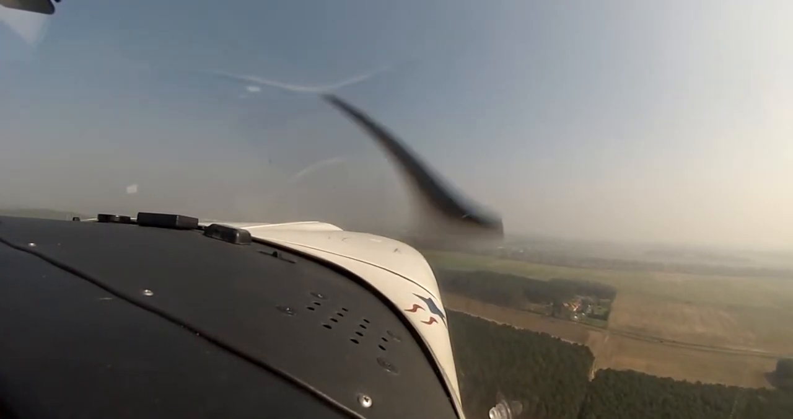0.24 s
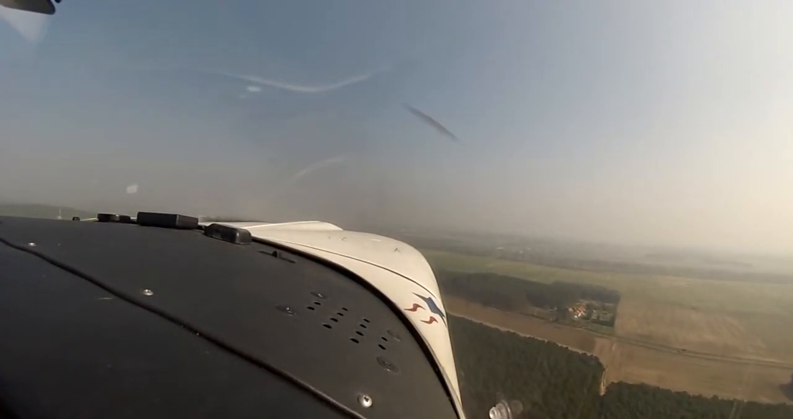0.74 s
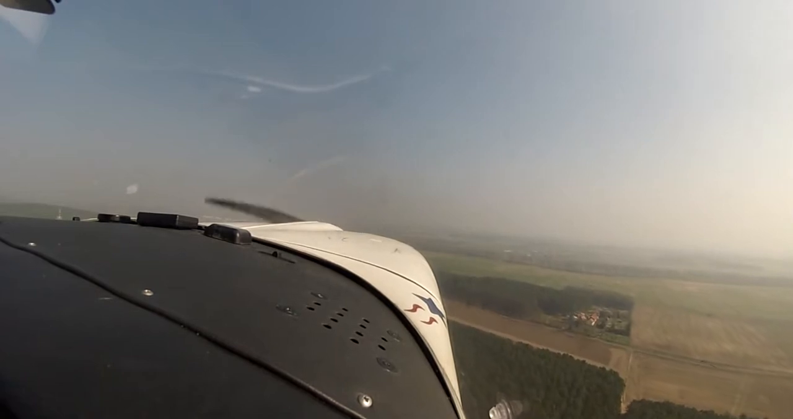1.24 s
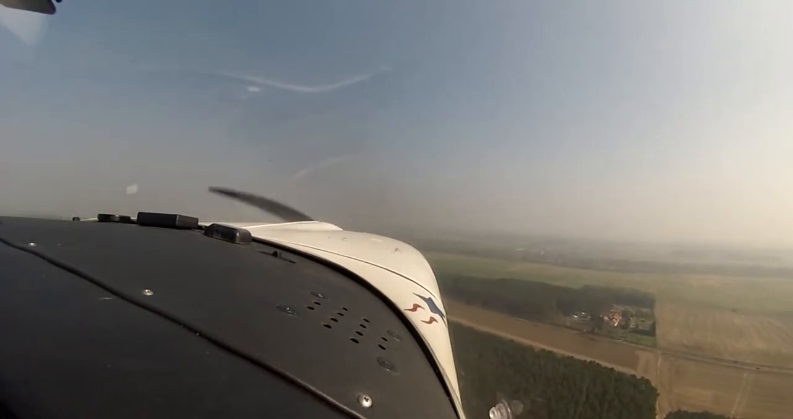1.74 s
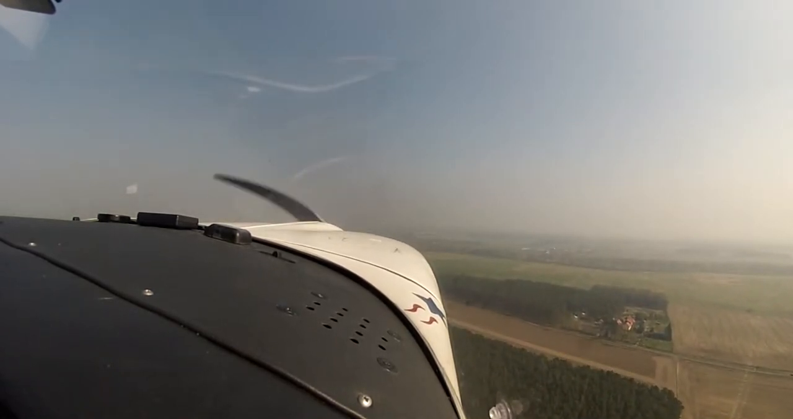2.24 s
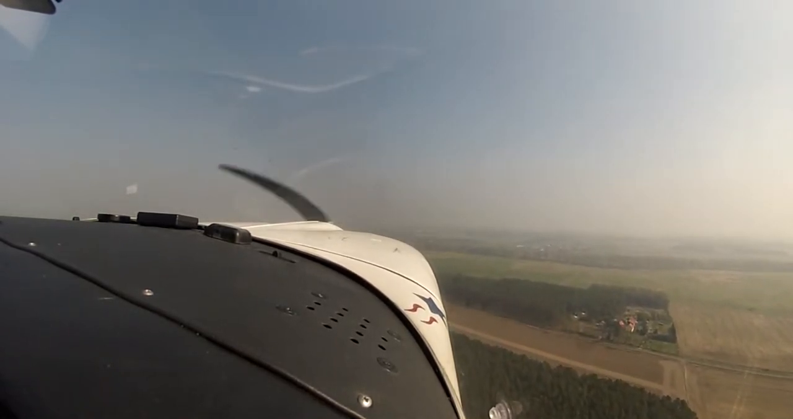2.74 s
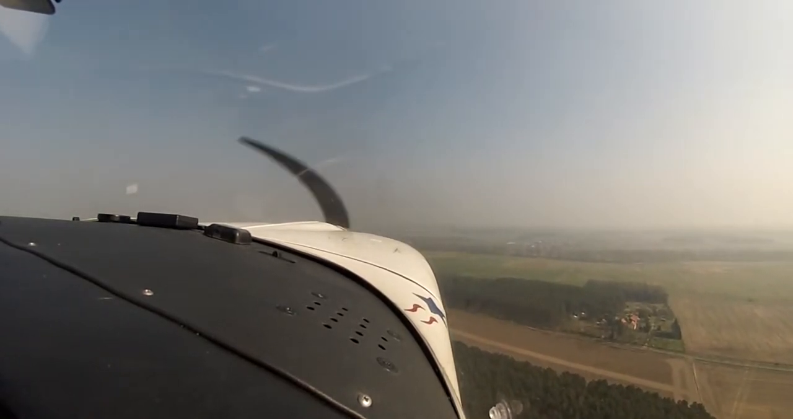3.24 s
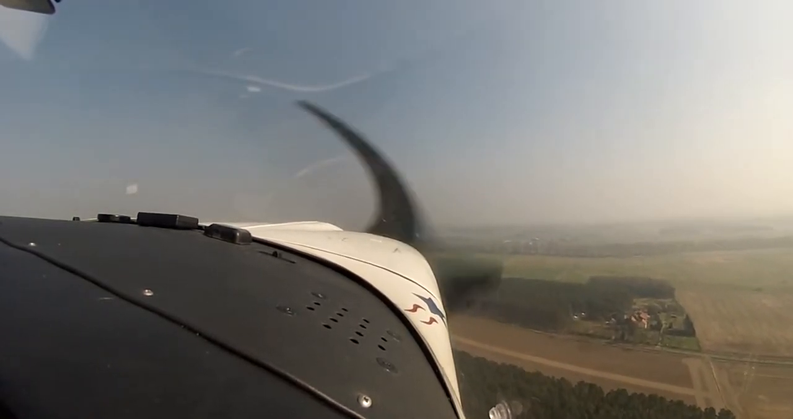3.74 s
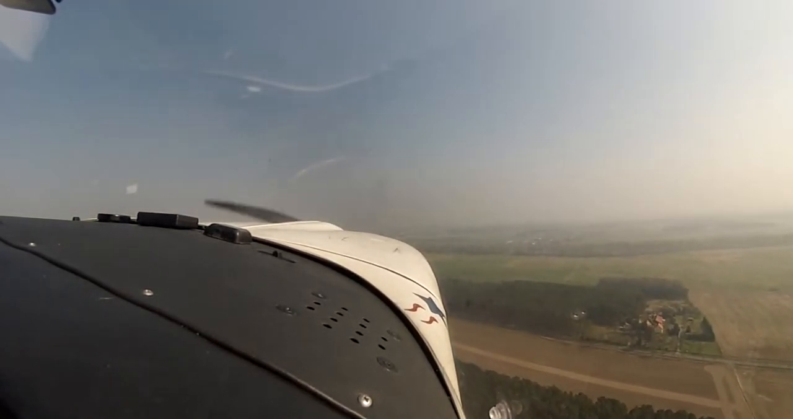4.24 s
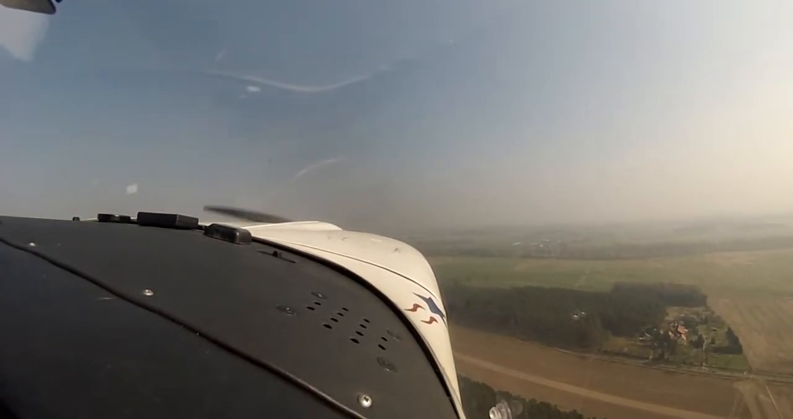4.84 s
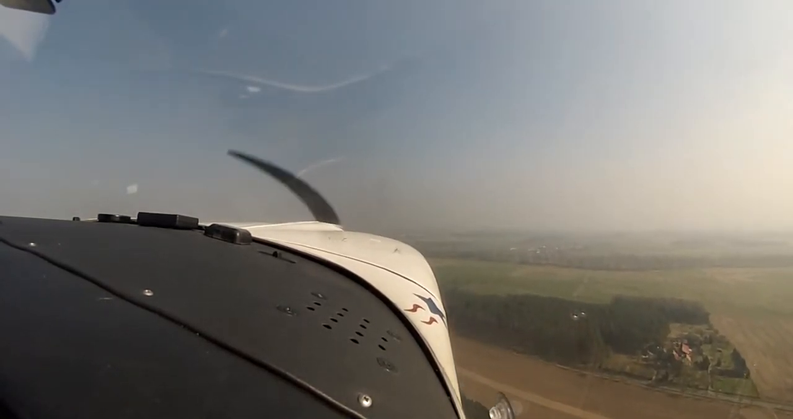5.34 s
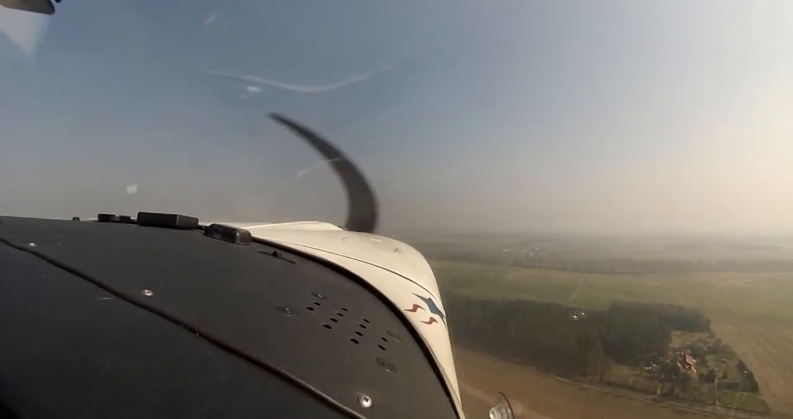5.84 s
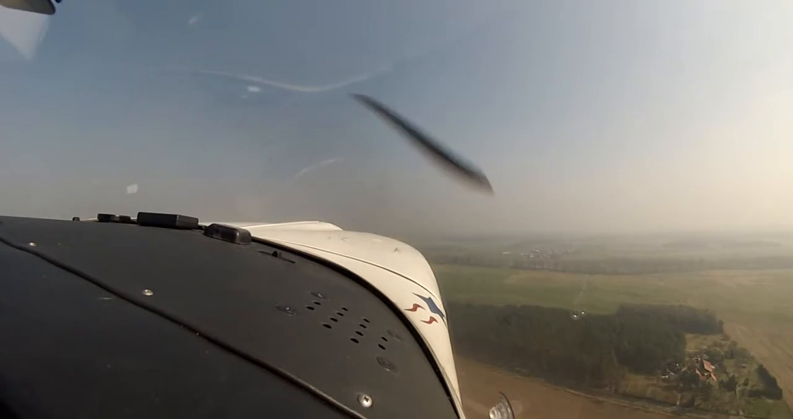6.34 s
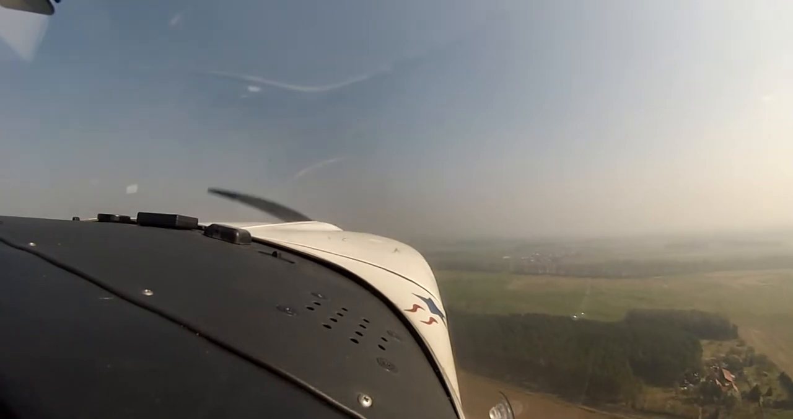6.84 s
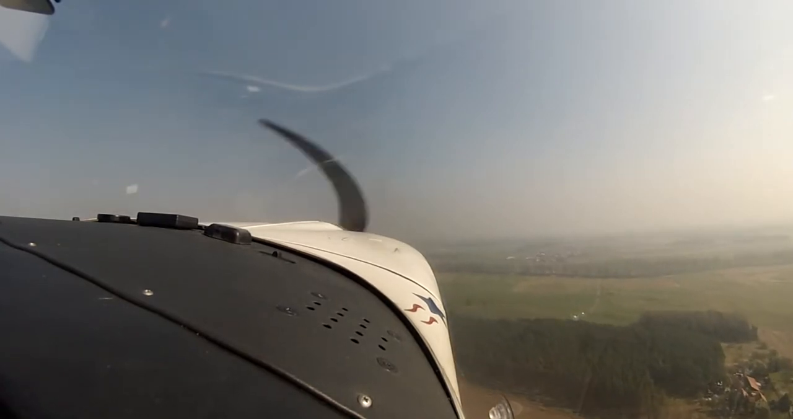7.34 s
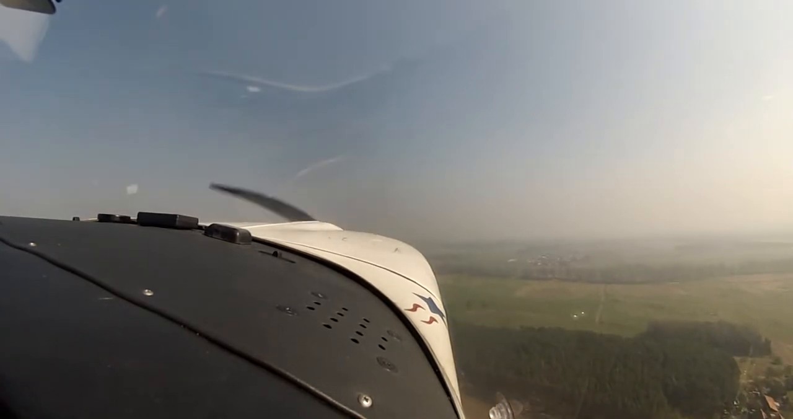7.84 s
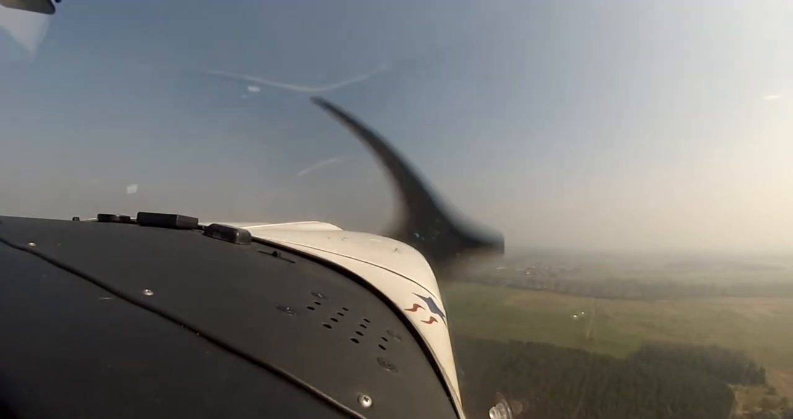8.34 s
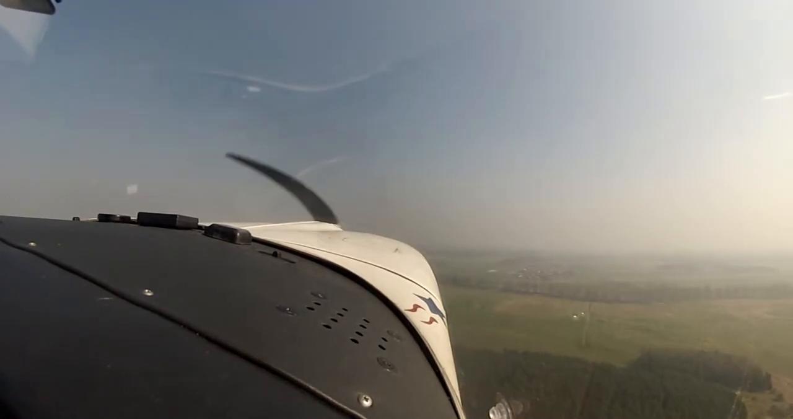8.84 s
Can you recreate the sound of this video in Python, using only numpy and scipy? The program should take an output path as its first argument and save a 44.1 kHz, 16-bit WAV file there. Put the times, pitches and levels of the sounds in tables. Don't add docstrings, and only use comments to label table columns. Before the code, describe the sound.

A small propeller aircraft engine drones steadily at climb power inside the cockpit, with rapid hard knocking, low airflow roar and faint hiss.

```python
import sys
import numpy as np
from scipy import signal
from scipy.fft import rfft, irfft
from scipy.io import wavfile
from scipy.ndimage import uniform_filter1d

SR = 44100
rng = np.random.default_rng(int(sys.argv[2]) if len(sys.argv) > 2 else 0)


def unload_audio(sound):
    columns = np.transpose(np.atleast_2d(sound))
    steps = np.round(np.clip(columns, -1, 1) * 32767)
    wavfile.write(sys.argv[1], SR, steps.astype(np.int16))


def nominal_scale(level):
    x = np.asarray(level, float) / 20
    return 10 ** x


N = 400869

# (time [s], crankshaft speed [rpm], shaft shake level [dB])
ENGINE_RUN = [(0.0, 2589.1, -23.5), (0.87, 2586.2, -24.2), (1.29, 2582.5, -23.8), (1.7, 2585.2, -24.8),
              (2.34, 2583.0, -27.6), (2.84, 2594.9, -23.9), (3.71, 2599.7, -23.7), (4.28, 2597.2, -24.1),
              (4.84, 2601.7, -25.1), (5.26, 2595.6, -25.5), (5.68, 2596.0, -23.3), (6.25, 2592.4, -25.0),
              (6.96, 2611.1, -23.2), (7.61, 2616.1, -26.1), (7.88, 2619.2, -25.6), (8.22, 2615.1, -24.5),
              (9.09, 2608.0, -24.4)]


def crank_cycles():
    time_s, rpm, _ = np.transpose(ENGINE_RUN)
    start_cycle = .0143
    return start_cycle + np.cumsum(np.interp(np.arange(N) / SR, time_s, rpm)) / (120 * SR)


CYCLE = crank_cycles()

# (multiple of the engine cycle [-], level [dB])
SHAFT_ORDERS = [(1, -32.5), (2, 0), (3, -20.5), (4, -15), (5, -5.5), (6, -25.5), (7, -23.5), (8, -10),
                (9, -12.5), (10, -27.5), (11, -22), (12, -20), (13, -42.5), (14, -17.5), (15, -24.5),
                (16, -22), (17, -17.5), (18, -10), (19, -25.5), (20, -19.5), (22, -28), (24, -27.5),
                (25, -29), (26, -24.5), (28, -28.5), (30, -32.5), (32, -36.5), (37, -32.5), (38, -37.5),
                (40, -28)]
PANEL, STEADY = (45, 46, 47, 48, 49, 53, 54, 55, 56, 58), (5, 18)
EARLY, LATE = (3, 4, 7, 9, 15, 16, 17, 20), (1, 6)
SWELLING, WANING = (4, 12, 16, 28, 30, 32, 45, 47, 48, 53, 54, 55, 58), (19,)


def drone():
    coarse_s, fine_s = np.arange(N // 64 + 2) * 64 / SR, np.arange(N) / SR
    time_s, _, shake = np.transpose(ENGINE_RUN)
    shake_db = np.interp(coarse_s, time_s, shake)
    order_db = {k: -35.5 - 0.272 * (k - 21) for k in range(21, 45)}
    order_db.update(dict.fromkeys(PANEL, -33.5))
    order_db.update(dict(SHAFT_ORDERS))
    out = np.zeros(N)
    for k, db in order_db.items():
        wobble_db = (.45 if k in STEADY else .7) * drift(hz=2, coarse=True)
        trend = int(k in SWELLING) - int(k in WANING)
        swell_db = 0.95 * (coarse_s - coarse_s.mean()) * trend
        if k == 2:
            level_db = shake_db + .4 * wobble_db
        else:
            level_db = -24.5 + db + swell_db + wobble_db
        lead = 1.8 if k in EARLY else -1.7 if k in LATE else -.4
        lead += 2 * np.pi * rng.random() * (k > 20)
        waver = .003 * k * drift(hz=3, coarse=True)
        size = np.interp(fine_s, coarse_s, np.sqrt(2) * nominal_scale(level_db))
        phase = 2 * np.pi * k * (CYCLE % 1 - .5) + np.interp(fine_s, coarse_s, lead + waver)
        out += size * np.cos(phase)
    return out


# (crank angle [degrees], peak level [dB], ring [Hz], length [ms], spread [dB])
CRANK_KNOCKS = [(23, -25.6, 1480, 3.5, 3.0), (35, -28.2, 2270, 2.5, 3.0), (86, -35.8, 1260, 7.0, 3.0),
                (113, -37.4, 2150, 5.6, 3.0), (181, -22.1, 1630, 3, 2.0), (216, -31.7, 2300, 3.8, 3.0),
                (220, -23.1, 1480, 5.0, 2.0), (278, -25.9, 1300, 2.5, 3.0), (337, -31.9, 1430, 5.3, 3.0),
                (384, -27.6, 1610, 3.1, 3.0), (421, -30.0, 1340, 3.0, 3.0), (465, -32.7, 1970, 1.9, 3.0),
                (488, -29.3, 1560, 3.8, 3.0), (560, -17.8, 1410, 2.6, 2.0), (578, -34.8, 2130, 8.4, 3.0),
                (621, -34.8, 1460, 5.3, 3.0), (642, -33.8, 1290, 8.4, 3.0), (693, -30.8, 1370, 2.5, 3.0)]


def knocks():
    turns = np.arange(-1, int(CYCLE[-1]) + 1)
    margin = 900
    ring, swing = np.zeros(N + 2000), np.zeros(N + 2000)
    span = np.arange(-300, 300)
    firing = rng.standard_normal((len(turns), 4, 2))
    together = .75
    for degrees, db, hz, ms, spread_db in CRANK_KNOCKS:
        late, strong, detune = rng.standard_normal((len(turns), 3)).T
        shared = firing[:, degrees // 180].T
        late, strong = together * shared + np.sqrt(1 - together ** 2) * np.array([late, strong])
        at = np.interp(turns + degrees / 720, CYCLE, np.arange(N), left=-500, right=N + 500)
        at += 36e-6 * SR * late
        index = np.round(at)[:, None].astype(int) + span
        t = (index - at[:, None]) / SR
        width = np.where(t < 0, .3, .45) * ms / 1000
        fades = 170 < degrees < 300
        fade_db = -.018 * (turns - turns.mean()) * fades
        peak = nominal_scale(db + fade_db + 0.72 * spread_db * strong)
        shape = peak[:, None] * np.exp(-(t / width) ** 2)
        ring_hz = hz * (1 + .01 * detune[:, None])
        np.add.at(ring, index + margin, shape * np.sin(2 * np.pi * ring_hz * t))
        np.add.at(swing, index + margin, shape)
    return ring[margin:margin + N], swing[margin:margin + N]


# (frequency [Hz], level [dB per Hz])
CASE_COLOUR = [(850, -24.5), (950, -37), (1040, -6), (1110, -24.5), (1290, -2.5), (1390, -12.5), (1520, 0),
               (1750, -5), (1945, -13.5), (2180, -4), (2300, -12), (2450, -8.5), (2580, -24.5), (2680, -16)]


def through_case(x, share):
    f, db = np.transpose(CASE_COLOUR)
    hz = np.abs(np.fft.fftfreq(4096, 1 / SR))
    log_gain = np.log(nominal_scale(share * np.interp(hz, [*f, 3200], [*db, -60])))
    taps = np.fft.ifft(np.exp(np.conj(signal.hilbert(log_gain)))).real[:2048]
    return signal.oaconvolve(x, taps)[:N]


def case_buzz(swing):
    return roar(CASE_COLOUR, patchy_db=1.64) * evened(1 + 0.18 * evened(swing))


def clatter():
    pattern = rng.standard_normal(400)
    slip = 0.0011 * drift(hz=18.0)
    patter = np.interp((CYCLE + slip) % 1, np.arange(400) / 400, pattern, period=1)
    return evened(through_case(patter, share=0.86))


# (frequency [Hz], level [dB per Hz])
RUMBLE_COLOUR = [(26, -4.5), (45, -4), (70, -13), (130, 0), (170, -4), (260, -11), (340, -10), (450, -14.5),
                 (560, -19), (680, -16.5), (740, -28.5), (850, -15.5), (950, -26)]


def rumble():
    return roar(RUMBLE_COLOUR, patchy_db=2.5)


# (frequency [Hz], level [dB per Hz])
HISS_COLOUR = [(2500, 1), (2750, 2), (3200, -1), (3700, -3.5), (3980, -4.5), (4350, -11), (5000, -6),
               (5500, -11.5), (5860, -17.5), (6200, -15), (7500, -20.5), (10300, -26), (13400, -28.5),
               (13750, -42), (14200, -31), (15800, -39)]


def air_hiss(swing):
    return roar(HISS_COLOUR, patchy_db=0.94) * evened(1 + 0.17 * evened(swing))


def ticks():
    out, t = np.zeros(N), np.arange(400) / SR
    for hz in (3260, 3560, 3920, 4880, 5370):
        strength = nominal_scale(4.1 * np.minimum(rng.exponential(1, N), 2))
        hits = strength * (rng.random(N) < 6.5 / SR)
        ping = np.sin(2 * np.pi * hz * t) * signal.windows.hann(len(t)) ** 2
        out += signal.oaconvolve(hits, ping)[:N]
    return evened(out)


def roar(spectrum, patchy_db):
    frames, hz = N // 512 + 5, np.fft.rfftfreq(2048, 1 / SR)
    a, b, patches = rng.standard_normal((frames, len(hz), 3)).T
    patches = uniform_filter1d(patches, size=12, axis=0)
    patches = evened(uniform_filter1d(patches, size=8, axis=1))
    f, db = np.transpose(spectrum)
    colour_db = np.interp(np.log(hz + 1), np.log(f), db, left=-90, right=-90)
    z = (a + 1j * b) * nominal_scale(colour_db[:, None] + patchy_db * patches)
    return evened(signal.istft(z, nperseg=2048, noverlap=1536)[1][:N])


def drift(hz, coarse=False):
    z = rng.standard_normal(N // 64 + 2)
    lowpass = 1 + (np.fft.rfftfreq(len(z), 64 / SR) / hz) ** 2
    slow = evened(irfft(rfft(z) / lowpass, len(z)))
    return slow if coarse else np.interp(np.arange(N) / 64, np.arange(len(z)), slow)


def evened(x):
    return x / np.sqrt(np.mean(x ** 2) + 1e-20)


def scene():
    ring, swing = knocks()
    case = nominal_scale(3.0) * through_case(ring, share=0.57)
    case += nominal_scale(-47) * clatter() + nominal_scale(-34) * case_buzz(swing)
    case *= nominal_scale(0.12 - 0.035 * (np.arange(N) - N / 2) / SR)
    air = nominal_scale(-35.5) * rumble() + nominal_scale(-54.5) * air_hiss(swing)
    return (drone() + case + air + nominal_scale(-73) * ticks())[None]


def roll_off(x):
    return signal.sosfilt(signal.butter(12, 15741, fs=SR, output="sos"), x)


def record(dry):
    notch_hz, notch_width_hz, notch_share = 1945, 90, .6
    notched = signal.lfilter(*signal.iirnotch(notch_hz, notch_hz / notch_width_hz, SR), dry)
    heard = dry + notch_share * (notched - dry)
    treble = np.diff(heard, prepend=heard[:, :1])
    carrier = np.cos(2 * np.pi * 12901 * np.arange(N) / SR)
    return roll_off(heard + nominal_scale(-28.5) * treble * carrier)


dry = scene()
out = record(dry)
unload_audio(out)
```